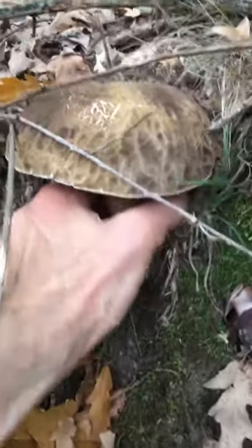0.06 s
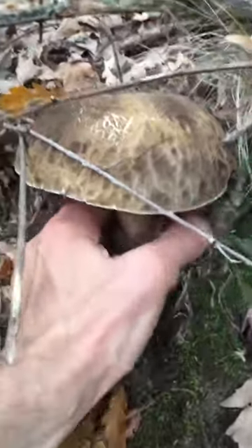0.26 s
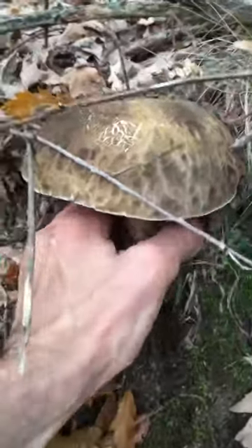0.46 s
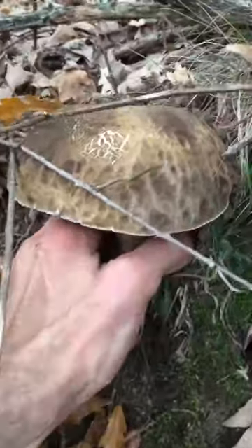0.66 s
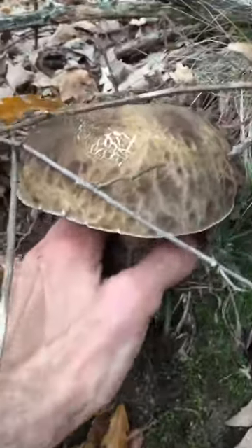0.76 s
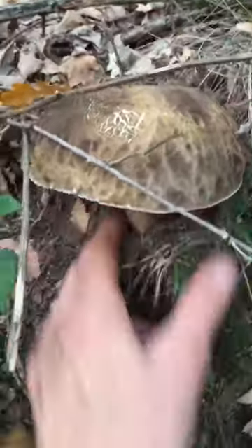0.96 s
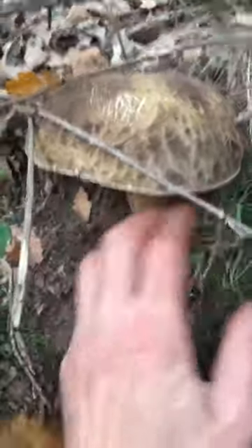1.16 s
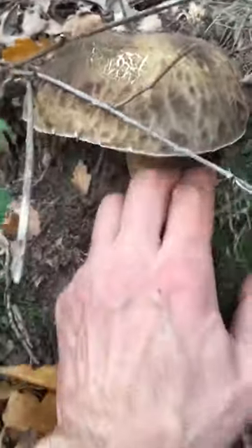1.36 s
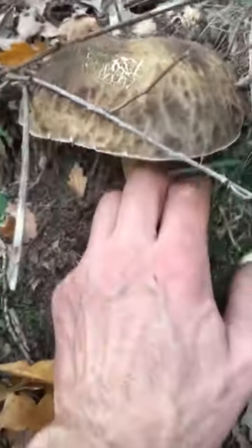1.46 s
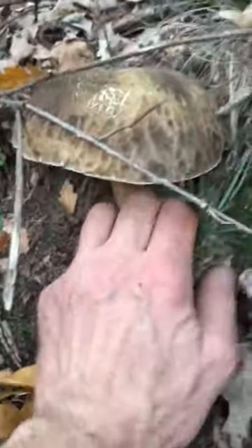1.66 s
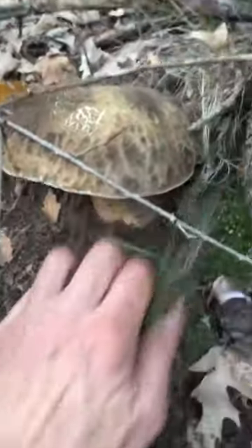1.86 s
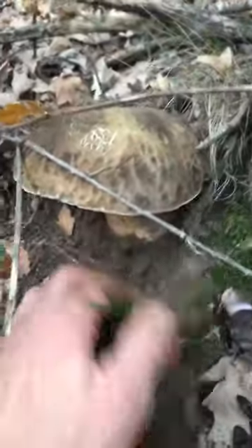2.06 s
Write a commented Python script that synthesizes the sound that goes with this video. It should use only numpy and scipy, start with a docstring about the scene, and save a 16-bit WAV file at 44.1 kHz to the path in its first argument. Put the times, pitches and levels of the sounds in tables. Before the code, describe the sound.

Dry leaves rustle under a hand, close up in a quiet wood. Small crisp snaps cluster at 0.2-0.45 s, then it thins to faint ticks until about 0.75. Crackling builds to the loudest, brightest burst near 1.07, with faint soft ground thumps. Irregular crinkles continue; dull finger knocks and soil scrapes come around 1.7 and 1.95, with a final snap near 2.04. Faint wind lies beneath.

```python
"""Dry leaves crackle in clumps and stems snap throughout, over scraped soil and faint wind;
soft ground thumps come midway and fingers knock near the end.
A hand stirs leaves, grass and soil on a forest floor, close to a microphone.
Crackle and crumbs are random trains of tiny cracks and rings; snaps are noise bursts that ring a leaf.
Knocks are damped modes, thumps are sinking tones, wind and the quiet of the wood are coloured noise.
The litter scatters all the sounds of the hand."""
import sys
import numpy as np
from scipy import signal
from scipy.io import wavfile
from scipy.ndimage import uniform_filter1d

SR = 44100
rng = np.random.default_rng(int(sys.argv[2]) if len(sys.argv) > 2 else 0)


def linear_from_db(decibels):
    """Turn decibels (scalar or array-like) into linear amplitude factors; 0 gives 1."""
    return 10 ** (np.asarray(decibels, float) / 20)


def to_wav(sig):
    """Store sig (one row per channel, or 1-D mono) as 16-bit WAV at the path in sys.argv[1].

    Samples outside -1..1 are clipped; the rate is SR.
    """
    pcm = np.clip(np.atleast_2d(sig), -1, 1) * 32767
    pcm = np.round(pcm).astype(np.int16)
    wavfile.write(sys.argv[1], SR, pcm.T)  # frames by channels


N = 92786  # samples


def evened(x):
    """Scale to unit rms."""
    return x / np.sqrt(np.mean(x ** 2) + 1e-20)


def noise():
    """White noise for the whole scene."""
    return rng.standard_normal(N)


def curve(points):
    """Gain over time, interpolated in dB."""
    time_s, level_db = np.transpose(points)
    return linear_from_db(np.interp(np.arange(N) / SR, time_s, level_db))


def colour(x, points):
    """Causal minimum-phase filter with the given spectrum."""
    freq_hz, level_db = np.transpose(points)
    bin_hz = abs(np.fft.fftfreq(4096, 1 / SR))
    log_gain = np.log(linear_from_db(np.interp(np.log(bin_hz + 1), np.log(freq_hz + 1), level_db)))
    min_phase = np.exp(np.conj(signal.hilbert(log_gain)))
    taps = np.fft.ifft(min_phase).real[:2048]
    return signal.oaconvolve(x, taps)[:N]


def add(mix, start_s, sound):
    """Mix a sound in at its start, cut at the end of the scene."""
    part = mix[round(start_s * SR):][:len(sound)]
    part += sound[:len(part)]


def ring(pitch_hz, cycles):
    """Damped mode with a soft start; its decay reaches 1/e in a third of its cycles."""
    turns = np.arange(900) / SR * pitch_hz
    decay = np.exp(-3 * turns / cycles)
    return np.sin(2 * np.pi * turns) * decay * np.minimum(turns / 0.6, 1)


def crack(z, pitch_hz, decay_s, bright_db):
    """A leaf tears: a short noise burst, part bright edge, part ringing the leaf; unit peak."""
    spikiness = 0.6  # 0 = smooth tear, 1 = a few sharp fibres
    u = np.arange(len(z)) / SR / decay_s
    burst = z * abs(z) ** spikiness * np.sqrt(u) * np.exp(-u)
    body = np.convolve(burst, ring(pitch_hz, cycles=5.6))[:len(z)]
    edge = np.diff(burst, prepend=0)
    sound = body / np.linalg.norm(body) + linear_from_db(bright_db) * edge / np.linalg.norm(edge)
    return sound / abs(sound).max()


def grains(shapes, per_s, spread_db, clump):
    """Random trains of small sounds, mostly tiny, one train per shape; unit rms."""
    out = np.zeros(N)
    for shape in shapes:
        size = rng.exponential(1, N)
        hit = rng.random(N) < per_s / len(shapes) / SR
        ticks = linear_from_db(spread_db * np.minimum(size, 3)) * hit
        out += signal.oaconvolve(ticks * clump, shape / np.linalg.norm(shape))[:N]
    return evened(out)


def clumps(depth_db, decay_s):
    """Litter gives way together about every decay_s: a sudden swell that dies away."""
    give = rng.exponential(1, N) * (rng.random(N) < 1 / (decay_s * SR))
    swell = signal.lfilter([1], [1, -np.exp(-1 / (decay_s * SR))], give)
    swell = uniform_filter1d(swell, size=30)
    return linear_from_db(depth_db * np.minimum(evened(swell - swell.mean()), 1.1))


# how hard the hand stirs the litter: [time_s, level_db]
STIR_LEVEL = [(0.0, -53), (0.08, -72.5), (0.12, -60.5), (0.19, -68), (0.24, -45.5), (0.25, -43.5),
              (0.32, -46.5), (0.32, -52), (0.38, -55), (0.4, -58), (0.43, -46), (0.47, -53.5),
              (0.54, -50.5), (0.62, -66), (0.63, -54), (0.67, -58), (0.68, -68), (0.75, -60), (0.77, -51),
              (0.77, -59.5), (0.81, -48), (0.87, -42.5), (0.89, -50.5), (0.92, -41), (0.94, -42.5),
              (1.05, -39.5), (1.07, -27), (1.14, -34.5), (1.15, -47), (1.27, -39), (1.3, -43),
              (1.312, -36.5), (1.36, -40.5), (1.39, -60.5), (1.4, -48.5), (1.42, -57), (1.46, -40.5),
              (1.49, -49), (1.53, -51), (1.55, -50), (1.56, -56), (1.65, -44), (1.67, -57), (1.69, -43.5),
              (1.72, -46), (1.78, -61.5), (1.82, -46), (1.84, -56), (1.88, -43.5), (1.93, -41.5),
              (1.95, -37), (1.99, -37), (2.02, -44.5), (2.04, -35), (2.07, -46.5), (2.1, -52)]
# dry bright leaves against softer grass: [time_s, tilt_db_per_octave above 3 kHz]
DRYNESS_TILT = [(0, 0), (.2, 0.5), (.45, -3.5), (.7, -1.5), (.85, -2), (1.1, 3), (1.4, 1.5), (1.7, 1),
                (1.9, 0), (2.1, 2.5)]
# colour of crackle and hiss: [freq_hz, level_db]
LEAF_COLOUR = [(180, -65), (400, -36), (900, -11.5), (2100, 2), (4000, 4), (8500, -0.5), (16000, -5)]


def leaves():
    """Clumped leaf cracks and a soft hiss of rubbing grass, both following the stir."""
    shapes = [crack(rng.standard_normal(500), pitch_hz, 0.00027 * rng.uniform(1.0, 1.39), bright_db=8.5)
              for pitch_hz in np.geomspace(1200, 12000, num=40)]
    crackle = grains(shapes, per_s=2200, spread_db=3.5, clump=clumps(2.5, 0.0021))
    hiss = linear_from_db(-9) * evened(noise() * clumps(0.67, 0.0075))
    litter = evened(colour(crackle + hiss, LEAF_COLOUR))

    freq_hz, time_s, z = signal.stft(litter, SR, nperseg=128)
    octaves = np.log2(np.maximum(freq_hz, 3000) / 3000)[:, None]
    tilt_db = np.interp(time_s, *np.transpose(DRYNESS_TILT)) * octaves
    # each handful of leaves has its own colour
    patch = uniform_filter1d(rng.standard_normal(z.shape), size=14, axis=1)
    patch_db = 1.5 * evened(uniform_filter1d(patch, size=6, axis=0))
    tinted = signal.istft(z * linear_from_db(tilt_db + patch_db), SR, nperseg=128)[1][:N]
    return curve(STIR_LEVEL) * tinted


# fingers dragging through soil and damp litter: [time_s, relative_level_db]
DIG_LEVEL = [(0.0, -60), (0.02, -50.5), (0.03, -68), (0.22, -69.5), (0.32, -55), (0.33, -78), (0.54, -62.5),
             (0.75, -72), (0.88, -59), (1.03, -52.5), (1.1, -40), (1.16, -58.5), (1.32, -49.5),
             (1.42, -66.5), (1.5, -53.5), (1.52, -62), (1.62, -57.5), (1.64, -43.5), (1.67, -64),
             (1.7, -43), (1.76, -61), (1.83, -62.5), (1.95, -37), (2.1, -64.5)]
# colour of the crumbs: [freq_hz, level_db]
SOIL_COLOUR = [(80, -13.5), (150, -22.5), (240, -4.5), (450, -8.5), (700, -2.5), (1100, -3), (2200, -2),
               (4000, -51)]


def soil():
    """Crumbs of earth shift under the fingertips: clumped trains of short damped rings."""
    shapes = [ring(pitch_hz, cycles=1.8) * rng.choice([-1, 1])
              for pitch_hz in np.geomspace(220, 3000, num=16)]
    crumbs = grains(shapes, per_s=2200, spread_db=3, clump=clumps(1.55, 0.0054))
    return linear_from_db(-2) * curve(DIG_LEVEL) * evened(colour(crumbs, SOIL_COLOUR))


# wind at the microphone: [time_s, relative_level_db]
GUST_LEVEL = [(0.0, -66), (0.5, -70.5), (0.58, -63.5), (1.05, -76.5), (1.45, -64.5), (1.84, -80),
              (2.1, -72)]
# colour of the wind: [freq_hz, level_db]
WIND_COLOUR = [(20, -66), (30, -18), (42, 2.5), (90, 1.5), (150, -9.5), (300, -45)]


def wind():
    """Lumpy wind rumble: low noise under a gust curve."""
    return linear_from_db(2.5) * curve(GUST_LEVEL) * evened(colour(noise(), WIND_COLOUR))


# colour of the quiet wood: [freq_hz, level_db]
AIR_COLOUR = [(100, 12), (300, 6), (700, 2), (1500, -23.5), (4000, -15), (6000, -22), (10000, -36),
              (16000, -5.5)]


def air():
    """The quiet of the wood: steady coloured noise."""
    return linear_from_db(-65.5) * evened(colour(noise(), AIR_COLOUR))


# single leaves and stems that snap: [start_s, peak_db, pitch_hz, bright_db (edge over ring)]
SNAP_EVENTS = [(0.1234, -44.5, 2860, -5), (0.2049, -38, 4330, 1), (0.235, -26, 2440, -3.5),
               (0.2838, -26, 3640, 7), (0.2945, -23, 4000, 1), (0.3083, -31.5, 4240, -5),
               (0.3116, -20, 3770, -2.5), (0.3543, -35.5, 3250, -5), (0.371, -35, 3640, 2),
               (0.414, -33, 4580, 3), (0.4289, -23.5, 4200, -1.5), (0.4451, -27, 6150, 4.5),
               (0.5373, -34, 2240, 4), (0.543, -35, 5900, 4), (0.5514, -43.5, 1220, 1.5),
               (0.5675, -41, 3300, -9), (0.632, -39.5, 3800, -6), (0.6636, -38, 14100, -17),
               (0.7144, -40.5, 4000, -1.5), (0.7641, -25.5, 4500, 0), (0.7834, -31.5, 5240, 2.5),
               (0.8277, -24, 2800, 5), (0.8662, -22, 13800, -13), (0.8713, -24, 3330, 5),
               (0.8994, -30.5, 3660, 2), (0.9111, -23.5, 12400, 16), (0.9172, -20, 3600, 2),
               (0.9548, -21, 4540, 8), (1.066, -13.5, 7900, -6), (1.079, -16, 6140, 0),
               (1.0987, -15.5, 8800, -3), (1.1387, -22.5, 8650, -9), (1.1612, -19.5, 3500, 9),
               (1.2202, -29, 7500, 6.5), (1.2556, -29, 8600, 3.5), (1.26, -22, 7000, 8),
               (1.287, -30, 13000, -9), (1.3073, -21, 7100, 7.5), (1.3299, -20, 6500, 4),
               (1.3584, -26.5, 2500, 11.5), (1.3924, -35, 9180, 2), (1.3989, -25, 6200, 0),
               (1.4565, -24.5, 7000, 4.5), (1.5457, -21, 8000, 6), (1.6075, -35.5, 4630, -9),
               (1.6444, -33, 4420, -2.5), (1.7186, -29.5, 6000, -1), (1.7243, -29, 4320, 1.5),
               (1.8135, -31, 5200, 1), (1.821, -32, 4120, -11), (1.8667, -31.5, 2230, -8),
               (1.8793, -22.5, 4900, 2), (1.91, -22, 1410, 6), (2.0418, -19.5, 5840, 5)]


def snaps():
    """Single leaves and stems crack, each a noise burst ringing at its own pitch."""
    out = np.zeros(N)
    for start_s, peak_db, pitch_hz, bright_db in SNAP_EVENTS:
        burst = rng.standard_normal(500)
        add(out, start_s, linear_from_db(peak_db) * crack(burst, pitch_hz, 0.001, bright_db))
    return out


def thump(start_hz):
    """A soft push whose pitch sinks as the ground yields."""
    peak_s, end_share = 0.0078, 0.416  # the pitch sinks toward this share of its start
    u = np.arange(3500) / SR / peak_s
    sag = end_share + (1 - end_share) * np.exp(-u / 2)
    return np.sin(2 * np.pi * np.cumsum(start_hz * sag) / SR) * u * np.exp(1 - u)


# the hand presses into soft ground: [start_s, peak_db, start_hz]
THUMP_EVENTS = [(1.052, -48, 266), (1.094, -53, 269)]


def thumps():
    """Low thumps of the hand, tones that swell and sink."""
    out = np.zeros(N)
    for start_s, peak_db, start_hz in THUMP_EVENTS:
        add(out, start_s, linear_from_db(peak_db) * thump(start_hz))
    return out


# fingers on stalk and soil: [start_s, relative_level_db, pitch_hz]
KNOCK_EVENTS = [(1.491, -36, 900), (1.597, -31.5, 720), (1.63, -60, 770), (1.696, -23, 714),
                (1.713, -23, 652), (1.909, -49, 993), (1.926, -30, 940), (1.95, -23, 780),
                (1.958, -17, 755), (1.959, -31.5, 243), (1.965, -18.5, 810), (1.979, -16, 1600)]


def knocks():
    """Dull knocks of the fingers, each one heavily damped mode."""
    out = np.zeros(N)
    for start_s, level_db, pitch_hz in KNOCK_EVENTS:
        add(out, start_s, linear_from_db(level_db - 4) * ring(pitch_hz, cycles=2.4))
    return out


def scatter(near):
    """The litter scatters sound: a noise tail that falls 60 dB in 20 ms."""
    t60_s, scatter_db = 0.02, -15
    t = np.arange(3000) / SR
    tail = rng.standard_normal(3000) * linear_from_db(-60 * t / t60_s) * (t > 0.001)
    return linear_from_db(scatter_db) * signal.oaconvolve(near, tail / np.linalg.norm(tail))[:N]


def scene():
    """The hand's sounds with their scatter, over wind and quiet air."""
    near = leaves() + soil() + snaps() + thumps() + knocks()
    return (near + scatter(near) + wind() + air())[None]


def top_cut(x):
    """Nothing passes above the cut-off."""
    return signal.sosfilt(signal.butter(12, 16440, fs=SR, output="sos"), x)


# dips of the microphone port: [freq_hz, level_db]
MIC_COLOUR = [(4400, -1), (5000, -4), (5700, 0.5), (9200, -1), (10200, -6.5), (11500, -2.5), (16000, -5.5)]


def record(dry):
    """The microphone port colours the treble, deep bass is cut, the top is band limited."""
    ported = colour(dry[0], MIC_COLOUR)[None]
    bass_cut = signal.butter(3, 36, "high", fs=SR, output="sos")
    low_pass = signal.firwin(801, 15850, window=("kaiser", 10), fs=SR)
    mix = signal.oaconvolve(signal.sosfilt(bass_cut, ported), low_pass[None], "same")
    return top_cut(mix)


dry = scene()
out = record(dry)
to_wav(out)
```